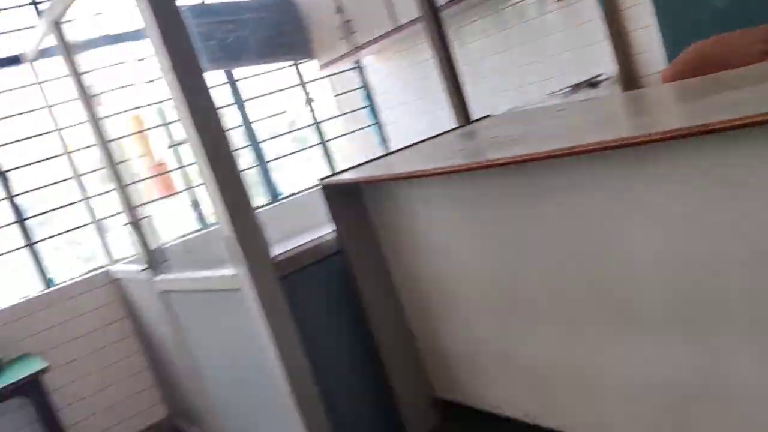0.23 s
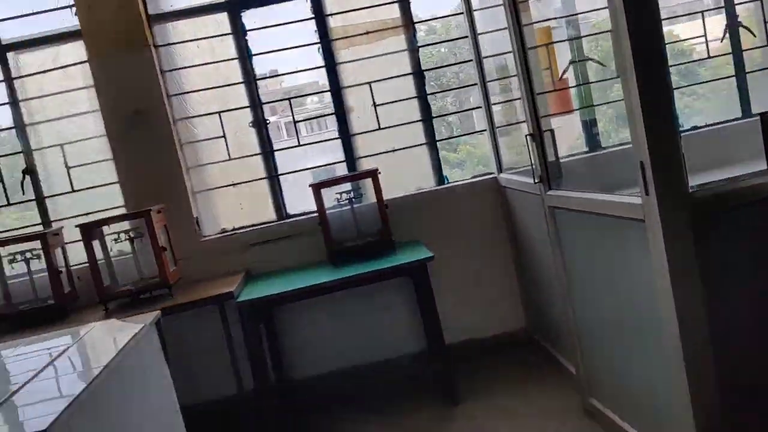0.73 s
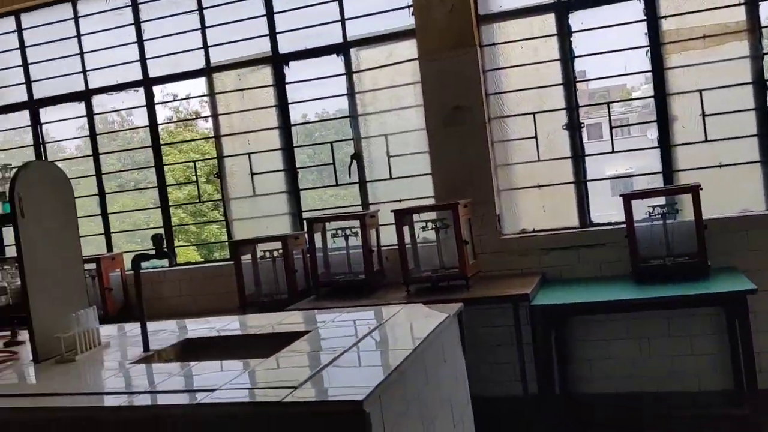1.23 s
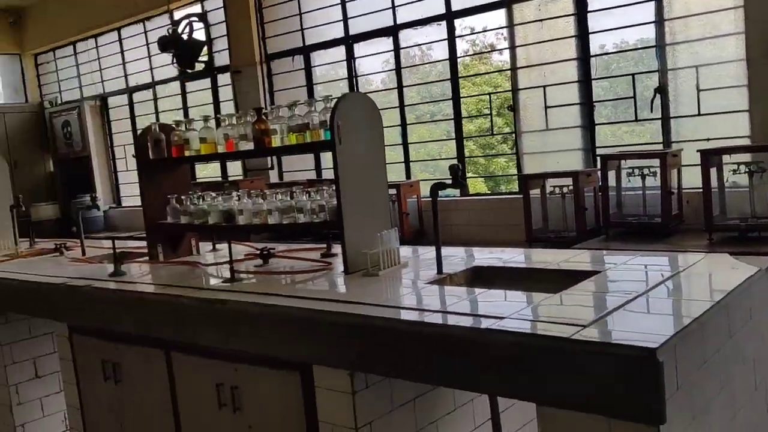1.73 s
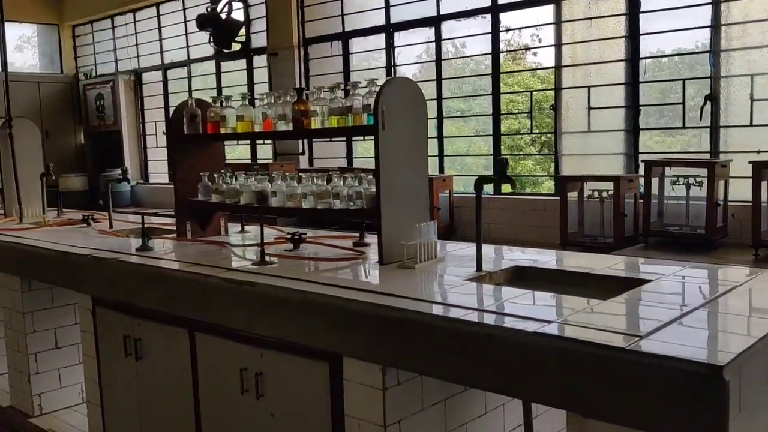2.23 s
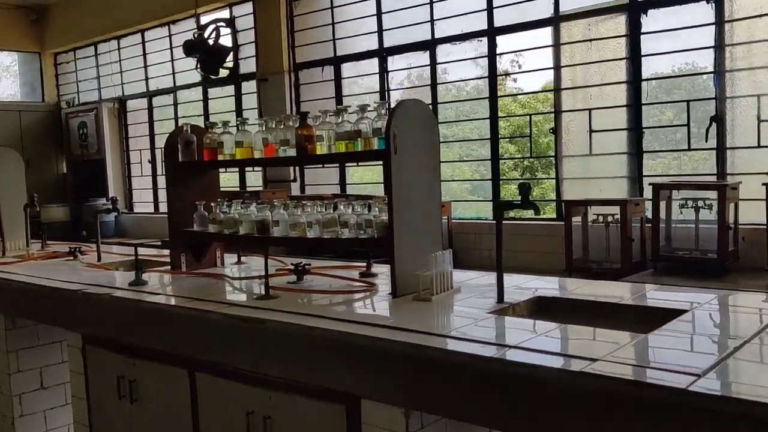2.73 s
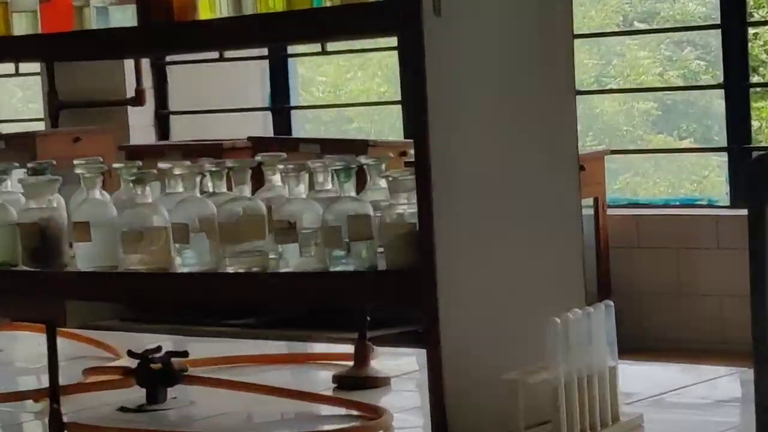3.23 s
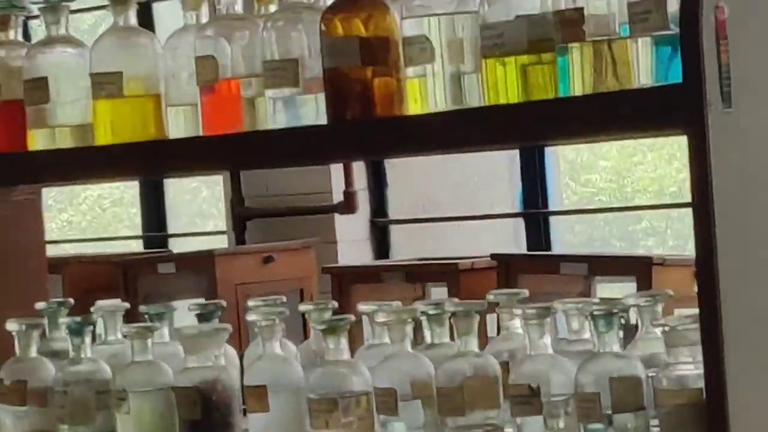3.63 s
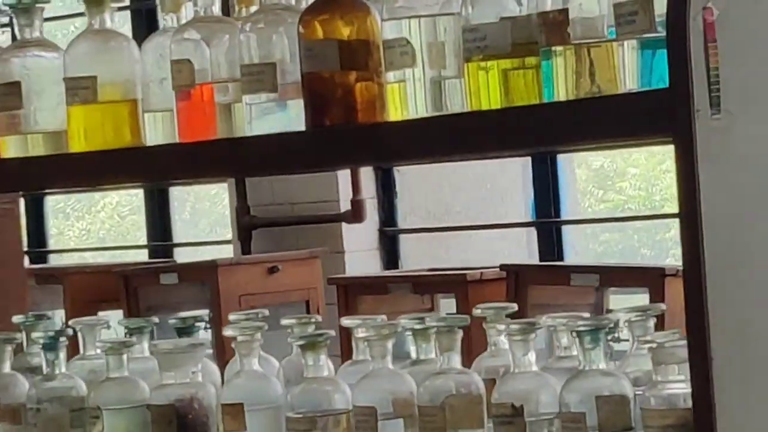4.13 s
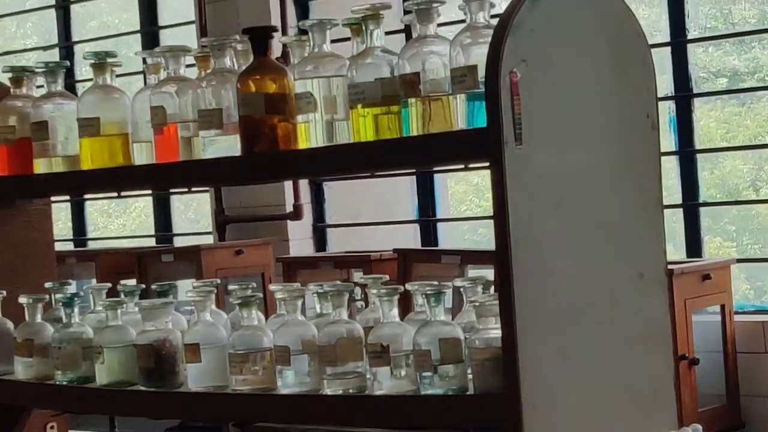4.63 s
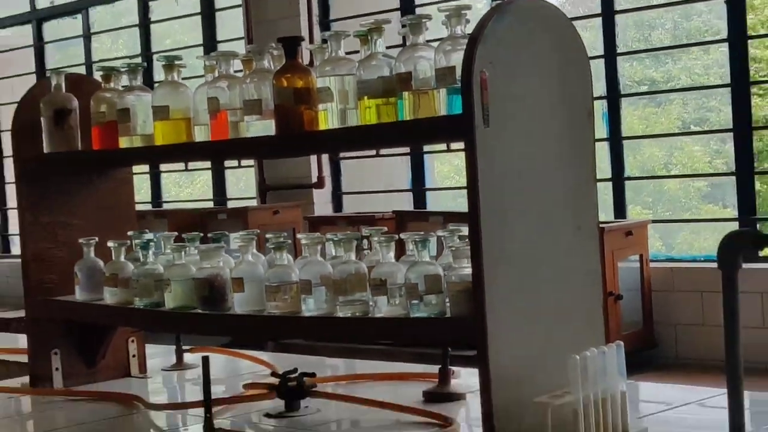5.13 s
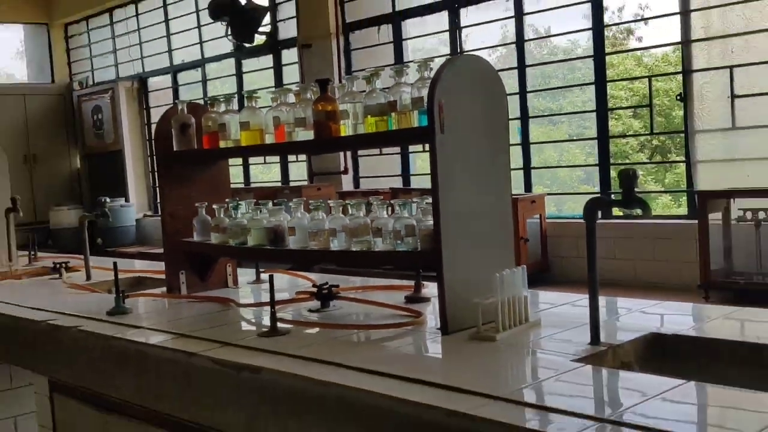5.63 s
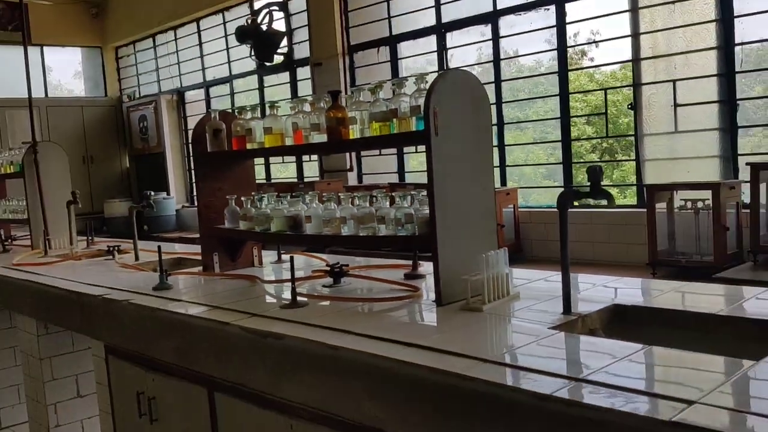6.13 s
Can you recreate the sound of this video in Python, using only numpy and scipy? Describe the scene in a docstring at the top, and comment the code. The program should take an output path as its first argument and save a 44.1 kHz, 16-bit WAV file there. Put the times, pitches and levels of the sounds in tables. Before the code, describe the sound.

Low town rumble in a tiled room, gritty sole scuffs, a bird's rising and hooked chirps, one sharp close tap and small handling clicks.

```python
"""Soles scuff a hard floor in a tiled room over a low town rumble: gritty noise bands with a random tail.
Birds call outside the windows: gliding sines, partly through random tails of the room.
Fingers swipe, rub, tick and bump a phone's case close to its two ports:
shaped noise, very short rings and slow dents."""
import sys
import numpy as np
from scipy import signal
from scipy.fft import rfft, irfft, next_fast_len
from scipy.io import wavfile
from scipy.ndimage import map_coordinates

SR = 44100
rng = np.random.default_rng(int(sys.argv[2]) if len(sys.argv) > 2 else 0)


def pcm_store(signal):
    """Save signal as 16-bit PCM."""
    levels = np.round(np.clip(np.atleast_2d(signal), -1, 1) * 32767)
    wavfile.write(sys.argv[1], SR, levels.astype(np.int16).T)


def invert_db(level):
    """Linear amplitude ratio for a level in decibels (20 dB per decade), elementwise."""
    return 10 ** (np.asarray(level, dtype=float) / 20)


N = 281843

# background level: time_s, level_db
AIR_LEVEL = [(0, -51.5), (.45, -52.5), (.75, -51), (1.35, -53.5), (1.9, -48), (3.3, -49.5), (3.65, -52),
             (4.5, -52.5), (6.39, -52)]
# town rumble spectrum: frequency_hz, relative_db_per_hz
RUMBLE_SPECTRUM = [(12, -5.5), (30, -6.5), (48, -1.5), (76, -9.5), (300, -21.5), (390, -43), (660, -120)]
# room hiss spectrum: frequency_hz, relative_db_per_hz
TONE_SPECTRUM = [(150, -4.5), (250, -7.5), (1000, -15.5), (1600, -17), (3100, -17.5), (5300, -15),
                 (5700, -17), (6300, -26.5), (8500, -25), (15700, -32)]
# left-right correlation of the background: frequency_hz, correlation
ALIKE = [(200, 0.941), (600, 0.67), (1400, 0)]
# decay of the tiled room: frequency_hz, t60_s
ROOM_DECAY = [(300, 1), (5000, 1), (15000, 0.61)]
# colour of the phone's ports: frequency_hz, gain_db
PORT_COLOUR = [(3000, 2), (5500, 3), (7000, 1), (12000, -3)]
# balance of far sources as the phone turns: time_s, left_right_db
FACING = [(0, -5.5), (.55, -4.5), (.9, -4.5), (1.45, -12), (1.8, 14), (2.75, 13.5), (3.1, 2), (3.5, 24),
          (3.75, 1), (4.7, 12)]
# faint narrow hisses from outside: start_s, length_s, centre_hz, level_db
HISSES = [(0.049, 0.5, 2320, -68), (1.108, 0.36, 3790, -77), (4.666, 0.38, 3600, -66),
          (4.684, 0.29, 8000, -70)]

# near bird, warbling buzz: offset_s, pitch_hz, gain_db
BUZZ = [(0, 4900, -15), (.04, 5510, -2), (.062, 6470, 1.5), (.085, 6090, 1), (.105, 5940, 1.5)]
# near bird, rising note: offset_s, pitch_hz, gain_db
RISE = [(0, 3350, -11), (.04, 4495, 0.5), (.068, 4980, -2.5), (.094, 5145, -1.5)]
# near bird, hooked note: offset_s, pitch_hz, gain_db
HOOK = [(0, 3850, -10), (.032, 4650, -3.5), (.036, 5000, -26), (.039, 5500, -4), (.043, 6500, -8),
        (.047, 7150, -20), (.058, 6650, -7), (.066, 5950, 2), (.088, 3590, -7)]
# near bird, steeper hook: offset_s, pitch_hz, gain_db
STEEP_HOOK = [(0, 3200, -12), (.025, 3750, -2), (.05, 4200, -1), (.056, 4600, -6), (.063, 5000, -3),
              (.07, 6200, -16), (.088, 5900, -12), (.1, 5300, -9)]
# near bird, hook with a lower start: offset_s, pitch_hz, gain_db
LOW_HOOK = [(0, 3200, -12), (.022, 3800, -2), (.064, 4150, -1), (.07, 4600, -9), (.073, 5500, -14),
            (.076, 6250, -3), (.082, 7000, -20), (.092, 6100, -13), (.103, 5200, -12)]
# near bird, short pip: offset_s, pitch_hz, gain_db
PIP = [(0, 5180, 4), (.02, 5370, 4.5), (.035, 5400, -3)]
# near bird's song: note_shape, start_s, gain_db, length_share
SONG = [(BUZZ, 1.006, -56, 0.3), (BUZZ, 1.147, -54.5, 0.97), (BUZZ, 1.383, -57, 0.88),
        (BUZZ, 1.592, -47.5, 0.72), (BUZZ, 1.785, -47, .7), (RISE, 2.011, -41.5, .91),
        (RISE, 2.226, -42, .91), (PIP, 2.185, -54, .8), (PIP, 2.403, -55, .8), (RISE, 2.449, -43, 0.94),
        (HOOK, 2.609, -44, 0.95), (HOOK, 2.753, -43, .9), (HOOK, 2.899, -43, 1.02),
        (STEEP_HOOK, 3.069, -48, 1), (LOW_HOOK, 3.254, -47.5, 1)]
# farther bird's level notes: start_s, length_s, gain_db
LEVEL_NOTES = [(2.504, 0.065, -58), (2.606, 0.07, -56), (2.685, .035, -60), (2.742, .045, -58),
               (2.796, .068, -56.5), (2.962, 0.085, -60), (3.072, .085, -61)]
# farther falling whistles: start_s, length_s, start_hz, end_hz, gain_db
WHISTLES = [(5.305, .39, 2640, 2010, -70), (5.78, .17, 2730, 1720, -73), (6.065, .023, 3213, 3160, -67),
            (6.102, .053, 3210, 3040, -65)]

# finger pressure near the right port, one list a rub: time_s, level_db
RUBS = [
    [(1.87, -55), (1.93, -55), (1.945, -44), (1.97, -39.5), (2.01, -42.5), (2.03, -42), (2.062, -33),
     (2.067, -65)],
    [(2.15, -86), (2.165, -59), (2.2, -49), (2.225, -40), (2.245, -53.5), (2.32, -58.5)],
    [(4.22, -108), (4.27, -62), (4.315, -41), (4.335, -82)],
]
# rubbing skin spectrum: frequency_hz, relative_db_per_hz
SKIN_SPECTRUM = [(88, -41), (150, 4.5), (966, 3.5), (2920, -7), (4060, -8), (8000, -18.5), (15500, -22.5)]
# case crackle under the grip: time_s, level_db
GRIP_LEVEL = [(1.7, -79), (2.0, -64), (3.2, -67), (3.6, -80), (4.25, -59), (4.31, -47), (4.34, -56.5),
              (4.6, -65.5), (5.1, -68.5), (5.2, -63), (5.42, -66), (5.7, -72)]
# bumps pressing on a port: centre_s, gain_db, width_s, left_right_db
BUMPS = [(1.838, -31.5, 0.004, 34), (2.093, -34, 0.011, 24), (2.17, -30, 0.003, -31),
         (2.21, -25.5, 0.0013, -24), (2.22, -25, 0.0053, -20), (2.537, -28, 0.0048, -25)]
# nail ticks on the case: start_s, gain_db, ring_hz, left_right_db
TICKS = [(2.061, -23, 900, -11), (2.0703, 0.3, 3400, -5), (2.119, -21, 835, -30), (2.207, -10.5, 745, -27),
         (2.235, -24, 1100, -16), (2.2456, -15, 5730, 24), (2.5272, -25.5, 1310, -25),
         (2.666, -33, 800, -25), (2.754, -33, 700, -25), (2.917, -33, 1000, -25), (3.509, -33, 4490, 16),
         (3.546, -34, 5370, 17), (4.298, -24, 3230, -10), (4.3065, -17.5, 2860, -11),
         (4.310, -20, 3400, -5), (4.343, -33, 3600, -15), (4.350, -31, 2850, -15), (4.361, -33, 3000, -15),
         (4.371, -21, 2400, -14), (4.419, -37, 3020, -13), (4.405, -36, 1700, -15), (4.456, -35, 2840, -13),
         (4.705, -38, 1500, -17), (4.857, -37, 1300, -10), (5.033, -41, 1600, -20), (5.151, -33, 1300, -28),
         (5.211, -39.5, 3020, -16), (5.238, -41, 4400, -16), (5.278, -39, 3700, -25),
         (5.5075, -36.5, 3000, -20)]
# woody knocks in the room: start_s, gain_db, ring_hz
KNOCKS = [(3.309, -33, 1400), (3.805, -37.5, 450)]
# dry swipes across the case: start_s, rise_s, slide_s, gain_db, grit_hz
SWIPES = [(1.727, 0.0036, 0.072, -45.5, 4230), (1.77, .04, 0.032, -41, 5170),
          (4.262, 0.035, .02, -42, 3400), (4.272, 0.033, 0.014, -48, 10500)]
# shoe scuffs: start_s, rise_s, slide_s, gain_db, grit_hz
SCUFFS = [(0.0, 0.0064, 0.038, -53.5, 6350), (.213, 0.0087, 0.036, -57, 5100),
          (.545, 0.018, 0.1, -46.5, 6200), (.809, 0.015, 0.033, -59, 6500),
          (.975, 0.01, 0.045, -60.5, 6450), (.972, 0.013, 0.094, -64, 640), (1.43, 0.1, 0.053, -58, 5960),
          (2.39, 0.007, 0.1, -57, 5650), (3.12, 0.01325, 0.035, -46.5, 4800),
          (3.699, 0.1, 0.014, -46.5, 9350), (3.758, 0.013, 0.092, -38, 4000),
          (5.599, .023, 0.066, -68, 4500)]
# resonances under a drag: centre_hz, width_hz, gain_db
SOLE_RINGS = [(450, 310, 2), (943, 480, 0), (1400, 270, 2.5), (2040, 300, 5.5), (2690, 410, 1)]

TONE_DB, TONE_SWING = -6, 1.5  # room hiss against rumble; its swing in dB per dB of background
TRILL_HZ, TRILL_DEPTH = 72.3, 0.068  # depth: share of pitch for an uncut note
SONG_DIRECT_DB, SONG_ROOM_DB, SONG_LINGER = -2.5, -3, 0.87  # linger: share of the room's t60
FAR_DIRECT_DB, FAR_ROOM_DB = -2.5, -6
LEVEL_NOTE_HZ, FADE_DB_PER_S = 3350, 17
FALL_BEND = 2.6  # how sharply a fall flattens out
HAND_PAN_DB = -49
SHAKE_PEAK_S, SHAKE_RISE_S, SHAKE_DB, SETTLE_DB_PER_S = 1.95, 0.18, -46, 14.5
TICK_DECAY_S, HARD_DECAY_S, HARD_DB = 0.0003, 0.00013, -8  # ticks above HARD_DB die sooner
CASE_HZ = 7100  # ticks are dulled above this
KNOCK_DECAY_CYCLES, KNOCK_ROOM_DB = 2.05, -7.5
SWIPE_PAN_DB, SWIPE_RING_DB, SWIPE_ROOM_DB = 2.5, -9, -13.5
SCUFF_RING_DB, RING_WEIGHT = -15.5, 0.12  # weight: dB of ring per dB of scuff gain above -44
# tilts per octave of grit above 5 kHz: finer grit rings less, hisses more
RING_TILT_DB, HISS_DB, HISS_TILT_DB = -2.5, -19, 29
STOP_T60_S = 0.049
TOP_HZ = 15780


def unit(x):
    """Scale to rms 1."""
    return x / np.sqrt(np.mean(x ** 2) + 1e-20)


def along(points, hz):
    """Interpolate frequency points on a log axis."""
    f, v = np.transpose(points)
    return np.interp(np.log(hz + 1), np.log(f + 1), v)


def curves(rows, off=None):
    """One value per sample for each column after the time; off applies outside the rows."""
    s, *cols = np.transpose(rows)
    return [np.interp(np.arange(N) / SR, s, c, off, off) for c in cols]


def sides(pan_db):
    """Left and right gains whose mean is 1."""
    left = 2 / (1 + invert_db(-np.asarray(pan_db)))
    return np.array([left, 2 - left])


def facing(s):
    """Left and right gains of a far source at time s."""
    return sides(np.interp(s, *np.transpose(FACING)))[:, None]


def wobble(rate_hz, size=N):
    """Smooth random curve with rate_hz knots a second."""
    knots = rng.standard_normal(int(size * rate_hz / SR) + 4)
    return map_coordinates(knots, [np.arange(size) * rate_hz / SR])


def filtered(x, response):
    """Multiply the spectrum by a response of frequency, zero-padded."""
    n = x.shape[-1]
    m = next_fast_len(n + 8192)
    return irfft(rfft(x, m) * response(np.fft.rfftfreq(m, 1 / SR)), m)[..., :n]


def peak(hz, centre_hz, width_hz):
    """Causal resonance with unit gain at its centre."""
    return 1j * hz * width_hz / (centre_hz ** 2 - hz ** 2 + 1j * hz * width_hz)


def grit(shape, spread_db):
    """Noise of tiny contacts of very unequal size."""
    return rng.standard_normal(shape) * invert_db(spread_db * rng.exponential(size=shape))


def add(track, s, sound):
    """Lay a stereo sound on the track from time s."""
    part = track[:, max(round(s * SR), 0):][:, :sound.shape[1]]
    part += sound[:, :part.shape[1]]


def room(x, linger=1):
    """Tiled room: fresh noise tail, unlike at the two ports, each frequency dying at its own speed."""
    hz, t, z = signal.stft(rng.standard_normal((2, SR)), SR, nperseg=256)
    decay = invert_db(-60 * t / linger / along(ROOM_DECAY, hz)[:, None])
    tail = signal.istft(z * decay, SR, nperseg=256)[1]
    return signal.fftconvolve(x, tail / np.linalg.norm(tail[0]), axes=1)[:, :N]


def background_noise(spectrum):
    """Stereo noise; mid and side weights set the left-right correlation by frequency."""
    def mid_side(hz):
        angle = np.arccos(np.clip(along(ALIKE, hz), -1, 1)) / 2
        return invert_db(along(spectrum, hz)) * [np.cos(angle), np.sin(angle)]
    mid, side = filtered(rng.standard_normal((2, N)), mid_side)
    return unit(np.array([mid + side, mid - side]))


def air():
    """Town rumble, nearly alike at both ports, plus the room's own hiss, both slowly wavering."""
    level_db, = curves(AIR_LEVEL)
    rumble = invert_db(0.27 * wobble(3.42)) * background_noise(RUMBLE_SPECTRUM)
    tone_db = TONE_DB + (TONE_SWING - 1) * (level_db - level_db.mean()) + 1.1 * wobble(6)
    return invert_db(level_db) * (rumble + invert_db(tone_db) * background_noise(TONE_SPECTRUM))


def hisses():
    """Narrow noise bands that swell quickly and fade slowly."""
    track = np.zeros((2, N))
    for s, length_s, hz, db in HISSES:
        n = round(length_s * SR)
        band = filtered(rng.standard_normal((2, n)), lambda f: np.abs(peak(f, hz, 0.24 * hz)) ** 2)
        swell = np.sin(np.pi * np.sqrt(np.arange(n) / n))
        add(track, s, invert_db(db) * facing(s) * swell * unit(band))
    return track


def whistle(shape, trill=0):
    """Gliding, slightly rough sine with soft ends; the air makes its level flutter."""
    s, hz, db = np.transpose(shape)
    t = np.arange(0, s[-1], 1 / SR)
    n = len(t)
    trill_width = trill * np.sin(.85 * np.pi * t / s[-1]) ** 2  # widest past the middle
    warble = trill_width * (np.sin(2 * np.pi * TRILL_HZ * t) + 0.75 * wobble(304.6, size=n))
    pitch_hz = np.interp(t, s, hz) * (1 + warble + 0.008 * wobble(378, size=n))
    ends = np.clip(np.minimum(t, s[-1] - t) / 0.00069, 0, 1)
    flutter_db = 2.2 * wobble(90, size=n) + 35 * trill * wobble(250, size=n)
    level = invert_db(np.interp(t, s, db) + flutter_db) * ends
    return np.sqrt(2) * level * np.sin(2 * np.pi * np.cumsum(pitch_hz) / SR)


def far_birds():
    """Farther birds: level notes and whistles falling fast at first, fading along each note."""
    far = np.zeros((2, N))
    level_notes = [(s, length_s, LEVEL_NOTE_HZ, LEVEL_NOTE_HZ, db) for s, length_s, db in LEVEL_NOTES]
    for s, length_s, start_hz, end_hz, db in level_notes + WHISTLES:
        u = np.arange(9) / 8
        fallen = np.expm1(-FALL_BEND * u) / np.expm1(-FALL_BEND)
        pitch_hz = start_hz + fallen * (end_hz - start_hz)
        glide = np.transpose([length_s * u, pitch_hz, db - FADE_DB_PER_S * length_s * u])
        add(far, s, facing(s) * whistle(glide))
    return invert_db(FAR_DIRECT_DB) * far + invert_db(FAR_ROOM_DB) * room(far)


def song():
    """Near bird through the windows; each note stirs a fresh random tail, shorter than the floor's."""
    track = np.zeros((2, N))
    for shape, s, db, pace in SONG:
        trill = TRILL_DEPTH * pace * (shape == BUZZ)  # only buzzes warble
        note = invert_db(db) * facing(s) * whistle(np.multiply(shape, [pace, 1, 1]), trill=trill)
        add(track, s, invert_db(SONG_DIRECT_DB) * note)
        add(track, s, invert_db(SONG_ROOM_DB) * room(note, SONG_LINGER))
    return track


def rubs():
    """Skin stutters along the case: uneven grit under pressure curves."""
    contacts = grit((2, N), spread_db=2.5) * invert_db(0.85 * wobble(150))
    skin = unit(filtered(contacts, lambda hz: invert_db(along(SKIN_SPECTRUM, hz))))
    pressure = sum(invert_db(curves(rub, off=-150)[0]) for rub in RUBS)
    return sides(HAND_PAN_DB)[:, None] * pressure * skin


def grip_crackle():
    """Sparse crackle of the case under the grip: grit gated by fast random swings."""
    bright = lambda hz: np.abs(peak(hz, 1060, 5600)) / (1 + (hz / 5500) ** 6)
    swing_db = 9 * np.tanh(wobble(260) - .2 + .4 * wobble(25))
    crackle = unit(filtered(grit(N, spread_db=2) * invert_db(swing_db), bright))
    return sides(HAND_PAN_DB)[:, None] * invert_db(curves(GRIP_LEVEL)[0]) * crackle


def hand_shake():
    """The hand shifts its hold and shakes the port: low noise that rises, then settles."""
    low = lambda hz: np.abs(peak(hz, 45.0, 104)) ** 2
    shake = unit(filtered(rng.standard_normal(N) * invert_db(5.2 * wobble(14)), low))
    since_s = np.arange(N) / SR - SHAKE_PEAK_S
    rise = np.clip(1 + since_s / SHAKE_RISE_S, 0, 1)
    settle = invert_db(SHAKE_DB - SETTLE_DB_PER_S * np.maximum(since_s, 0))
    return sides(HAND_PAN_DB)[:, None] * rise * settle * shake


def bumps():
    """Each bump pushes a port in with one slow dent."""
    track = np.zeros((2, N))
    for s, db, width_s, pan_db in BUMPS:
        u = np.arange(-4 * width_s * SR, 9 * width_s * SR) / SR / width_s
        push = -np.exp(-u ** 2 / 2)
        swing_back = 0.22 * np.exp(-((u - 3.5) / 2.8) ** 2 / 2)  # of the membrane
        add(track, s - 4 * width_s, invert_db(db) * sides(pan_db)[:, None] * (push + swing_back))
    return track


def tick(hz, decay_s):
    """Brief decaying ring with a snap of noise, dulled by the case."""
    t = np.arange(SR // 50) / SR
    ring = np.sin(2 * np.pi * hz * t) * np.exp(-t / decay_s) * (1 - np.exp(-t * hz / .12))
    snap = .45 * rng.standard_normal((2, len(t))) * invert_db(-60 * t / .009)
    click = filtered(snap, lambda f: peak(f, 1.26 * hz, 3 * hz) ** 2) - ring
    return filtered(click, lambda f: 1 / (1 + 1j * f / CASE_HZ) ** 2)


def ticks():
    """Nails ring the case briefly, the hardest ticks dying sooner."""
    track = np.zeros((2, N))
    for s, db, hz, pan_db in TICKS:
        decay_s = HARD_DECAY_S if db > HARD_DB else TICK_DECAY_S
        add(track, s, invert_db(db) * sides(pan_db)[:, None] * tick(hz, decay_s))
    return track


def knocks():
    """Woody knocks ring a few cycles and wake the room."""
    track = np.zeros((2, N))
    for s, db, hz in KNOCKS:
        add(track, s, invert_db(db) * facing(s) * tick(hz, KNOCK_DECAY_CYCLES / hz))
    return track + invert_db(KNOCK_ROOM_DB) * room(track)


def drag(rise_s, slide_s, hz, ring_db):
    """One stroke over dust: a broad gritty band, a hollow ring and a hiss on top."""
    t = np.arange(round((rise_s + slide_s + .1) * SR)) / SR
    octaves = np.log2(hz / 5000)
    stop_db = -60 * np.clip(t - rise_s - slide_s, 0, 1) / STOP_T60_S
    stroke = np.clip(t / rise_s, 0, 1) * invert_db(stop_db + 0.72 * wobble(32.0, size=len(t)))
    ring_gain = invert_db(ring_db + RING_TILT_DB * max(octaves, -.5))
    hiss_gain = invert_db(HISS_DB + HISS_TILT_DB * octaves)

    def colour(f):
        band = np.abs(peak(f, hz, 0.51 * hz)) ** 2
        ring = np.abs(sum(invert_db(g) * peak(f, c, w) for c, w, g in SOLE_RINGS))
        return band + ring_gain * ring + hiss_gain * f / (f + 3000)
    return stroke * unit(filtered(grit((2, len(t)), spread_db=2.0), colour))


def swipes():
    """Fingers drag across the case, with little room."""
    case = np.zeros((2, N))
    for s, rise_s, slide_s, db, hz in SWIPES:
        stroke = drag(rise_s, slide_s, hz, SWIPE_RING_DB)
        add(case, s, invert_db(db) * sides(SWIPE_PAN_DB)[:, None] * stroke)
    return case + invert_db(SWIPE_ROOM_DB) * room(case)


def scuffs():
    """Soles drag over the floor and fill the room; heavier steps ring more."""
    floor = np.zeros((2, N))
    for s, rise_s, slide_s, db, hz in SCUFFS:
        stroke = drag(rise_s, slide_s, hz, SCUFF_RING_DB + RING_WEIGHT * (db + 44.0))
        add(floor, s, invert_db(db) * facing(s) * stroke)
    return floor + room(floor)


def scene():
    """Events take the ports' colour; the air's spectra are given as they arrive."""
    outside = hisses() + far_birds() + song()
    hand = rubs() + grip_crackle() + hand_shake() + bumps() + ticks() + swipes()
    events = outside + hand + knocks() + scuffs()
    return air() + filtered(events, lambda hz: invert_db(along(PORT_COLOUR, hz)))


def band_limit(x):
    """A steep low-pass at the top of the band."""
    return signal.sosfilt(signal.butter(12, 16520, fs=SR, output="sos"), x)


def record(dry):
    """The phone keeps little above its band limit."""
    mix = filtered(dry, lambda hz: np.where(hz < TOP_HZ, 1, invert_db(-31)))
    return band_limit(mix)


dry = scene()
out = record(dry)
pcm_store(out)
```